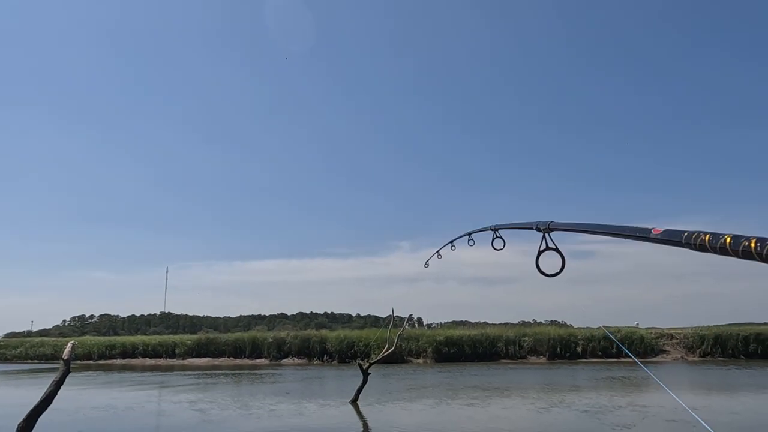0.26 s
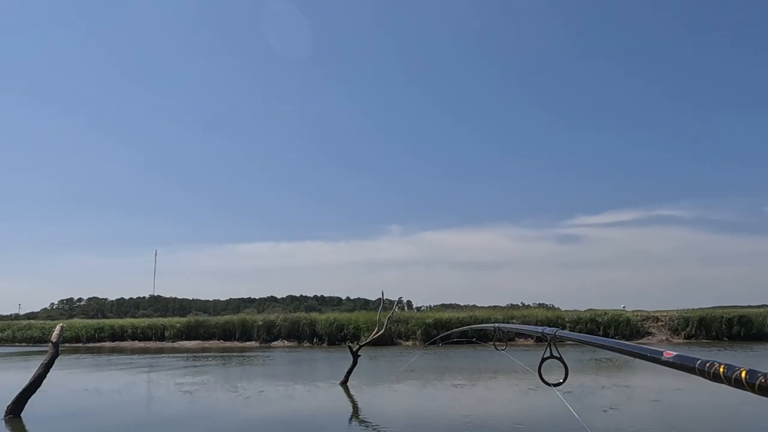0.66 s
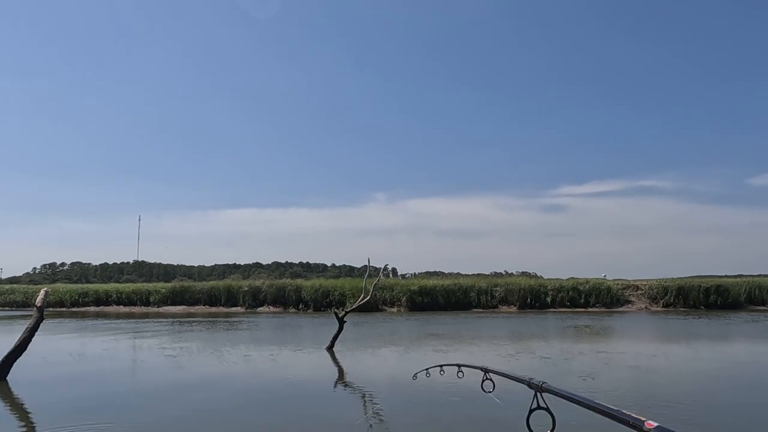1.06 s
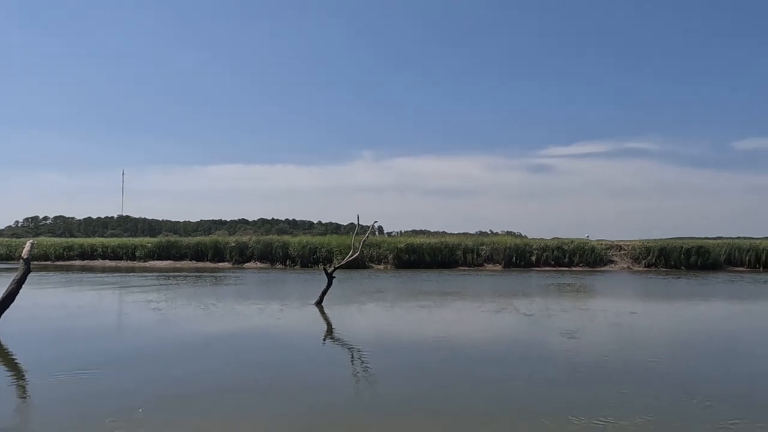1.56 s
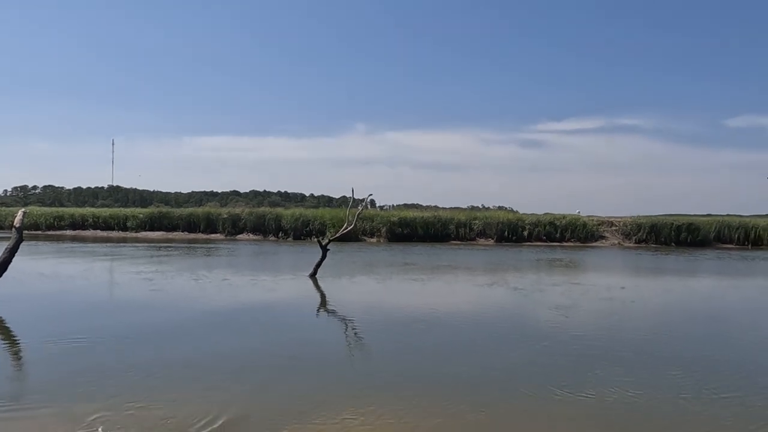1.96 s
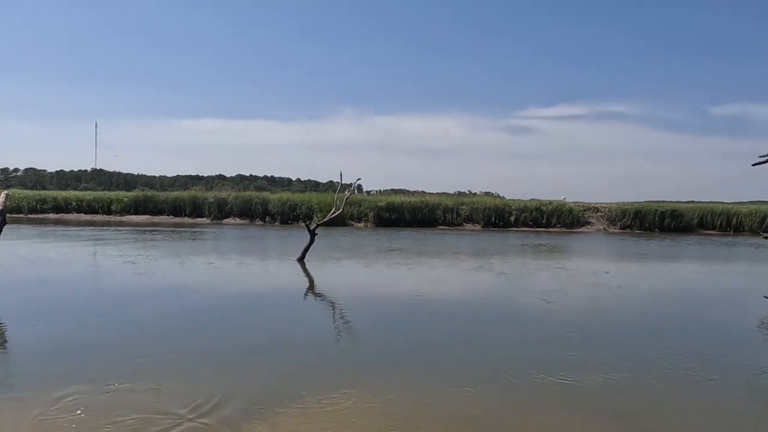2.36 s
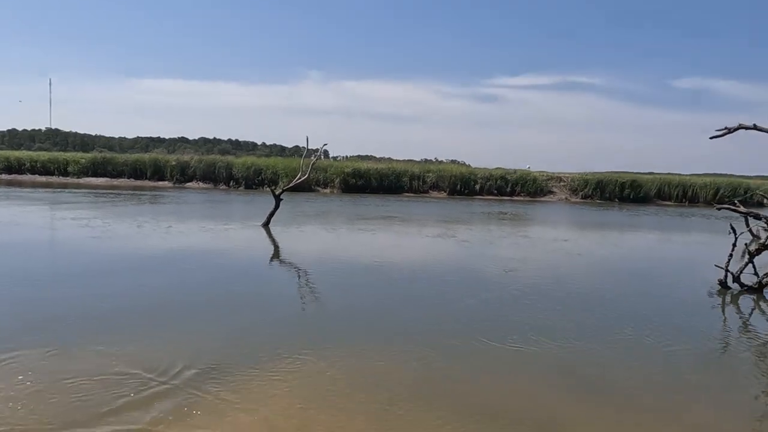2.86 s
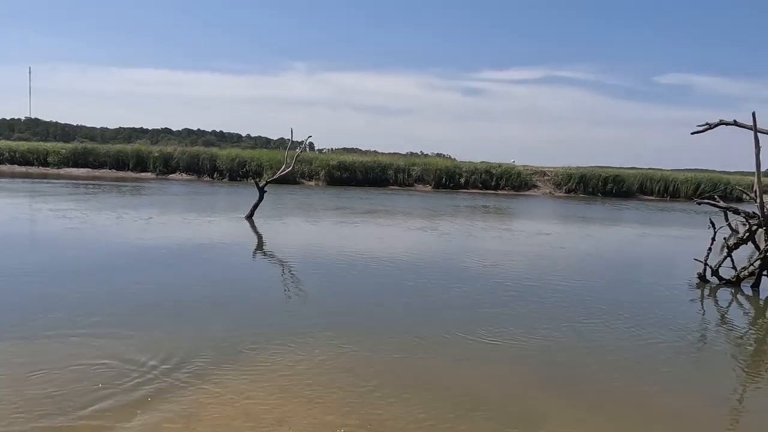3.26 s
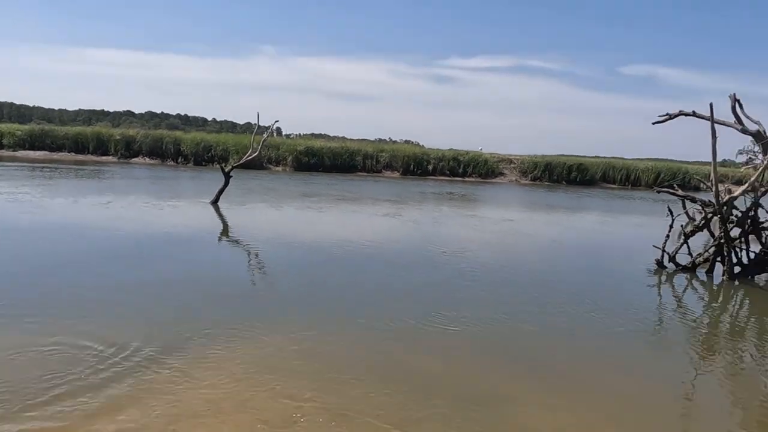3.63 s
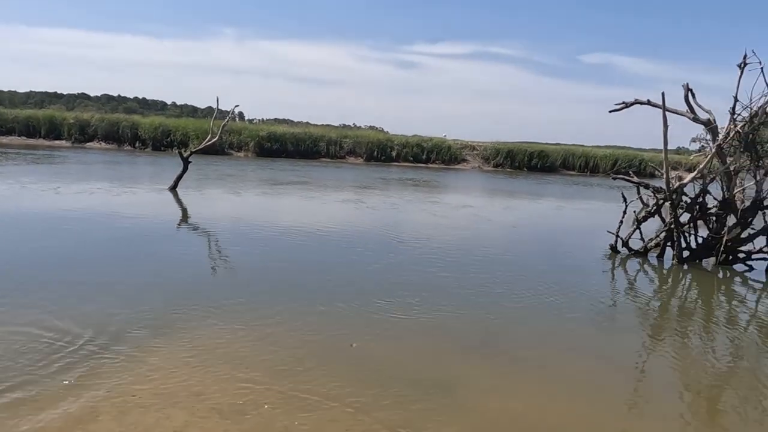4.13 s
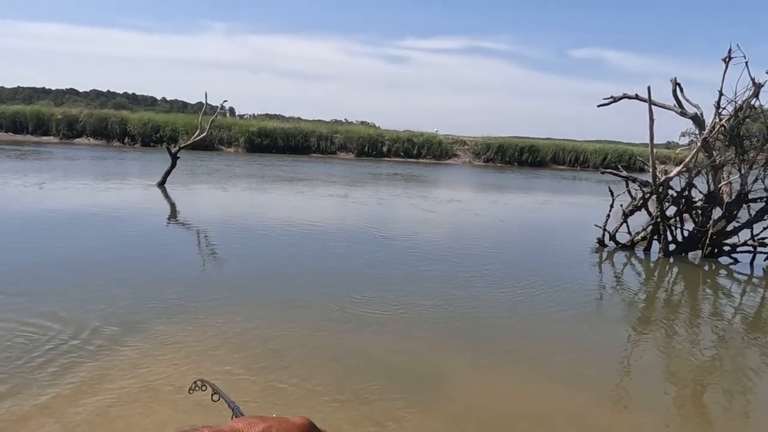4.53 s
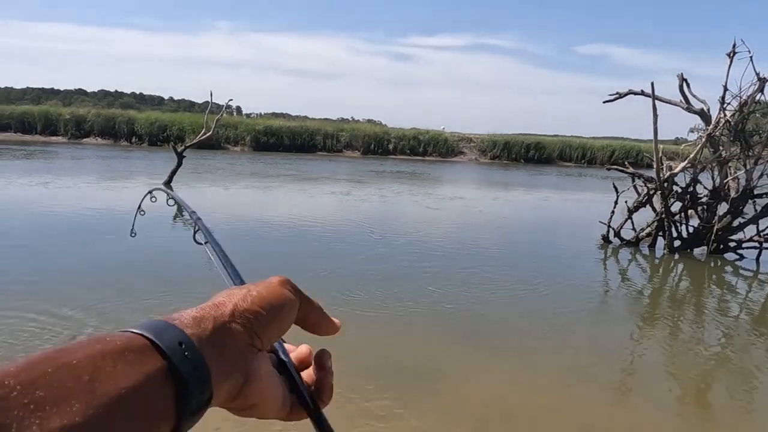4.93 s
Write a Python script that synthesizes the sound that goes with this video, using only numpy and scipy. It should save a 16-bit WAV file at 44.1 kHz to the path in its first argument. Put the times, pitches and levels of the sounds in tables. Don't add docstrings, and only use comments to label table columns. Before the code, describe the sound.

Open air at a creek bank, no echo, with a small stereo microphone close to the reel. Low wind rumble, buffeting and a hollow hum run throughout, over a very faint marsh rustle; a heavy low gust peaks near 2.3 s. From 0 to about 3.2 s a spinning reel is cranked in short uneven pushes: a wavering mid-high gear whine, dry rubbing and thin hiss, strongest around 0.8-1.0 s and again at 2.85 s. Dull knocks fall near 0.8, 1.6, 2.05 and 2.35 s among tiny clicks and ticks. A bright drip lands at 3.2 s. From 3.35 to 3.9 s wind makes a low, unsteady moan with light drips and faint brushing. At 4.2 s the water breaks: the loudest sharp slap comes at 4.37 s, followed by short gulps, gurgling bubbles and spray, cracks at 4.6 s, a deep rising gulp at 4.85 s, and patters to the end.

```python
import sys
import numpy as np
from scipy import signal
from scipy.io import wavfile

SR = 44100
rng = np.random.default_rng(int(sys.argv[2]) if len(sys.argv) > 2 else 0)


def master_out(mix):
    frames = np.transpose(np.atleast_2d(mix))
    ceiling = np.clip(frames, -1, 1)
    pcm = np.round(ceiling * 32767).astype(np.int16)
    wavfile.write(sys.argv[1], SR, pcm)


def invert_db(x):
    u = np.asarray(x, float) / 20
    return 10 ** u


N = 228967

# frequency in Hz, density in dB per Hz.
HISS_SPECTRUM = [(1000, -9), (1700, -2), (2440, -11), (2920, -9.5), (4150, -12.5), (5650, -10.5),
                 (10200, -20.5), (11700, -17.5), (13200, -40)]


def rms_one(x):
    return x / np.sqrt(np.mean(x ** 2) + 1e-20)


def in_time(rows):
    s, *columns = np.transpose(rows)
    return [np.interp(np.arange(N) / SR, s, c, left=-120, right=-120) for c in columns]


def at_hz(points, hz):
    table_hz, values = np.transpose(points)
    return np.interp(np.log(hz), np.log(table_hz), values)


def drift(rate):
    r = np.exp(-80 * np.pi * rate / SR)
    slow = signal.lfilter([1], [1, -2 * r, r * r], rng.standard_normal(N // 40 + 2002))[2000:]
    return np.interp(np.arange(N) / 40, np.arange(len(slow)), rms_one(slow))


def swells(rows, column, rise_db_s, fall_db_s):
    t = np.arange(0, N + 32, 32) / SR
    power = 0
    for row in rows:
        early = np.maximum(row[0] - t, 0)
        late = np.maximum(t - row[0] - row[1], 0)
        power = power + invert_db(2 * (row[column] - rise_db_s * early - fall_db_s * late))
    return np.interp(np.arange(N) / SR, t, 10 * np.log10(power + 1e-12))


def pair(likeness):
    mid, side = rng.standard_normal((2, N))
    alike = np.clip(likeness, 0, 1)
    return np.sqrt(.5 + alike / 2) * mid + np.sqrt(.5 - alike / 2) * side * [[1], [-1]]


def band(x, low_hz, high_hz, order=2):
    return signal.sosfilt(signal.butter(order, [low_hz, high_hz], "band", fs=SR, output="sos"), x)


def resonance(x, hz, width_hz):
    r = np.exp(-np.pi * width_hz / SR)
    poles = [1, -2 * r * np.cos(2 * np.pi * hz / SR), r * r]
    return signal.lfilter([(1 - r * r) / 2, 0, (r * r - 1) / 2], poles, x)


def grainy_noise(spectrum, per_s, size_db, grain_db, patchy_db, shared, size=2):
    # frequency in Hz, left-right likeness from 0 to 1.
    likeness_curve = [(20, .9), (60, .75), (130, .97), (400, 0.34), (1500, 0.73), (5000, 0.78),
                      (9000, 0.56), (15000, 0.12)]
    grains = invert_db(size_db * np.minimum(rng.exponential(1, N), 4)) * (rng.random(N) < per_s / SR)
    grains = invert_db(grain_db) * rms_one(signal.lfilter([1], [1, -1.92, .9216], grains))
    white = rng.standard_normal((2, 2, N))
    together = drift(3.6)
    low, top = spectrum[0][0], spectrum[-1][0]
    edges = np.geomspace(low, top, int(2 * np.log2(top / low)) + 2)
    out = 0
    for k, (a, b) in enumerate(zip(edges, edges[1:])):
        shake = 1 + np.roll(grains, k // size * N // 7)
        mid, side = band(shake * white[k % 2], a, b, order=3)
        hz = np.sqrt(a * b)
        alike = np.clip(at_hz(likeness_curve, hz), 0, 1)
        gain = invert_db(at_hz(spectrum, hz) + patchy_db * (shared * together + drift(21)))
        out = out + gain * (np.sqrt(1 + alike) * mid + np.sqrt(1 - alike) * side * [[1], [-1]])
    return rms_one(out)


def hits(table, pan_db, cycles=0.78, crack_ms=0.69, tail_db=-19.0):
    out = np.zeros((2, N + 2000))
    t = np.arange(2000) / SR
    swell = t * 1000 / crack_ms
    tail = invert_db(tail_db) * np.exp(-t / 0.0089) * (1 - np.exp(-swell ** 2))
    fade = swell ** 3 * np.exp(-swell * 3) * 11.3 + tail
    for s, db, hz, bright_db in table:
        noise = rng.standard_normal((3, 2000))
        ring = np.sin(2 * np.pi * hz * t) * (t * hz / cycles) * np.exp(1 - t * hz / cycles)
        crack = invert_db(4.5) * band(noise[0] * fade, hz * 0.54, min(hz * 1.43, 15000))
        bright_hz = min(4200 + 2000 * abs(noise[1, 0]), 7000)
        wide_noise = noise[1] + .5 * noise[2] * [[1], [-1]]
        bright = invert_db(bright_db - 1) * band(wide_noise * fade, bright_hz, 12000, order=3)
        hit = (ring + crack + bright) * invert_db([[pan_db / 2], [-pan_db / 2]])
        out[:, round(s * SR):][:, :2000] += invert_db(db) * hit
    return out[:, :N]


def marsh():
    rustle = grainy_noise(HISS_SPECTRUM, per_s=30., size_db=3.0, grain_db=-14, patchy_db=-4.5, shared=.3)
    onset = np.clip(np.arange(N) / SR / .07, 0, 1) ** 4
    return band(invert_db(-69) * rustle * onset, 870, 11800, order=4)


def wind():
    # time in seconds, level in dB.
    gust_curve = [(0.0, -44), (0.64, -31), (0.92, -36), (1.19, -44.5), (1.56, -23.5), (1.72, -38.5),
                  (2.14, -35.5), (2.3, -16.5), (2.41, -32.5), (3.04, -44.5), (3.22, -29.5), (3.47, -35.5),
                  (4.21, -38.5), (4.29, -30), (4.8, -32), (4.87, -43.5), (5.07, -26.5), (5.19, -29.5)]
    # start in seconds, hold in seconds, level in dB.
    eddy_rows = [
        (.02, 0.17, -42.5),
        (.9, 0.042, -39.5),
        (1.5, 0.26, -39),
        (4.29, 0.07, -42.5),
    ]
    # start in seconds, hold in seconds, level in dB.
    crosswind_rows = [
        (3.45, 0.23, -42),
        (3.85, 0.35, -48),
        (4.87, 0.21, -42),
    ]
    rise_db_s, fall_db_s = 54, 45
    slow_db, = in_time(gust_curve)
    calm = invert_db(-46 + 0.06 * (slow_db - slow_db.mean()))
    buffet_gain = np.hypot(calm, invert_db(swells(eddy_rows, 2, rise_db_s, fall_db_s)))
    cavity_gain = np.hypot(invert_db(-51.5), invert_db(swells(crosswind_rows, 2, rise_db_s, fall_db_s)))
    slow = rms_one(band(pair(0.93), 3.88, 19.3, order=4)) * invert_db([[-2.6], [2.4]])
    buffet = rms_one(band(resonance(pair(0.85), 24.0, 30.5), 14.8, 154))
    buffet = buffet * invert_db(3.0 * drift(1.9)) * invert_db([[-.8], [.8]])
    cavity = rms_one(band(resonance(pair(0.97), 166.0, 41.6), 91, 299, order=4)) * invert_db(0.71 * drift(13.5))
    skirt = rms_one(band(pair(0.9), 200, 397, order=3)) * invert_db(-65 + 2.2 * drift(2.8))
    return invert_db(slow_db) * slow + buffet_gain * buffet + cavity_gain * cavity + skirt


def moan():
    # time in seconds, pitch in Hz, level in dB.
    moan_curve = [(3.3, 152.5, -62), (3.37, 158, -33.5), (3.42, 148, -65), (3.5, 189.7, -33.5),
                  (3.58, 186.6, -39), (3.72, 172.9, -46), (3.8, 121.5, -45), (3.86, 164.7, -37.5),
                  (3.92, 180.3, -61)]
    hz, db = in_time(moan_curve)
    phase = 2 * np.pi * np.cumsum(np.maximum(hz, 0) * (1 + 0.088 * drift(29.7))) / SR
    return (np.sin(phase) + invert_db(-35.0) * np.sin(2 * phase)) * invert_db(db + 2.5 * drift(41))


def drips():
    # time in seconds, peak in dB, pitch in Hz, bright part in dB.
    drip_rows = [(.704, -42, 3330, -13), (2.4915, -43.5, 6400, -21), (3.2118, -33, 4600, -7),
                 (3.2887, -58, 1970, 22), (3.3026, -43.5, 3140, 6.5), (3.4984, -54.5, 3170, 5),
                 (3.5533, -56, 1944, 5), (3.5715, -41.5, 5000, -31), (3.8877, -44, 4640, -3),
                 (3.934, -42, 3406, 3.5), (3.9592, -40.5, 5410, 2.5), (3.9967, -42.5, 6960, -30),
                 (4.1178, -36, 5340, -13)]
    return hits(drip_rows, pan_db=4.5)


def slaps():
    # time in seconds, peak in dB, pitch in Hz, bright part in dB.
    slap_rows = [(4.213, -54, 2220, -15), (4.2387, -29, 2970, -32), (4.2772, -35, 1610, -19.5),
                 (4.347, -45, 1420, -36), (4.3695, -14.5, 2800, -22), (4.442, -59, 1650, -5),
                 (4.4553, -32.5, 2630, -8), (4.4735, -31, 1800, -12), (4.5, -36, 2100, -8),
                 (4.5398, -37, 2800, 1), (4.5992, -21, 4700, -12), (4.6016, -22, 4680, -14),
                 (4.6897, -35, 2700, -10), (4.9431, -38, 4900, -20), (4.3785, -31, 2600, -20),
                 (4.386, -34, 3200, -13), (4.298, -42, 7500, -7), (4.862, -38, 5800, -20),
                 (4.899, -32, 7000, -20), (5.1546, -39, 1940, 0), (4.7634, -40, 1260, -32),
                 (4.796, -33, 5400, -25), (4.839, -33, 1980, -15), (4.8788, -20, 1370, -8.5),
                 (4.92, -37, 6500, -10), (4.9875, -40, 1480, 5), (5.008, -37, 5500, 6),
                 (5.0218, -38, 1730, 15), (5.0282, -29, 1220, 0), (5.0455, -33.5, 1980, 8),
                 (5.142, -40.5, 1980, 10.5)]
    return hits(slap_rows, pan_db=3.5, cycles=1.7, crack_ms=0.85, tail_db=-15.0)


def bubble(start_hz, end_hz, length, late=1.3):
    u = np.arange(int(length * SR)) / (length * SR)
    hz = start_hz * (end_hz / start_hz) ** (u ** late)
    return np.sin(2 * np.pi * np.cumsum(hz) / SR) * np.sin(np.pi * u ** .5) ** 0.41


def short_tones():
    # time in seconds, start pitch in Hz, length in seconds, peak in dB.
    gulp_rows = [
        (3.224, 601, 0.05, -48.5),
        (3.358, 623, 0.04, -57),
        (3.4, 469, 0.079, -56),
        (4.561, 440, 0.021, -28),
        (4.718, 646, 0.0366, -42.5),
        (4.841, 285, 0.118, -29),
        (5.101, 598, 0.047, -50.5),
    ]
    # time in
    # seconds, pitch in Hz, length in seconds, peak in dB.
    pop_rows = [(.189, 235, 0.0163, -36), (1.15, 615, 0.041, -47), (2.6, 533, 0.015, -54),
                (.7, 1060, 0.04, -54), (3.305, 1004, 0.039, -49), (3.3, 316, 0.041, -42),
                (3.835, 1800, .014, -56), (3.892, 885, 0.034, -48.5), (3.99, 990, 0.04, -59),
                (4.17, 1690, 0.0047, -36), (4.28, 542, 0.011, -38.5), (4.402, 1264, .0087, -37),
                (4.779, 860, 0.0094, -36), (5.062, 2020, 0.0073, -39), (4.729, 1200, .02, -44),
                (5.128, 950, 0.018, -46), (5.158, 950, .02, -50), (.51, 2600, 0.071, -68),
                (3.53, 560, .06, -56), (4.345, 450, .008, -40), (4.3, 800, .015, -42),
                (4.52, 890, .02, -45), (4.702, 340, 0.012, -33.5), (4.589, 730, 0.018, -28),
                (4.635, 893, 0.042, -38), (4.652, 370, .018, -30.5), (4.632, 400, .018, -39),
                (5.177, 890, 0.077, -38.5)]
    # time in seconds, pitch in Hz, length in seconds, peak in dB.
    squeak_rows = [(.479, 1180, 0.03, -55), (.51, 1100, .025, -55), (.575, 2780, 0.075, -61),
                   (4.212, 1000, .014, -37), (4.264, 1050, .018, -39), (2.36, 1250, 0.028, -56.5),
                   (2.04, 1727, 0.084, -51.5), (2.31, 1600, 0.04, -45), (.685, 800, 0.03, -53),
                   (3.155, 1150, 0.05, -54), (3.21, 1750, .03, -56), (4.771, 1146, 0.008, -35)]
    events = [(*row, np.exp(7.0 * row[2] ** .7)) for row in gulp_rows]
    events += [(*row, 1.088) for row in pop_rows]
    events += [(*row, .83) for row in squeak_rows]
    out = np.zeros(N + SR)
    for s, start_hz, length, db, bend in events:
        deep = start_hz < 300
        wave = bubble(start_hz, start_hz * bend, length, 1.8 if deep else 1.3)
        if deep:
            wave = wave * (bend * 300 / start_hz) ** np.linspace(0, -.9, len(wave))
        out[round(s * SR):][:len(wave)] += invert_db(db) * wave
    return out[:N] * invert_db(3.5 * drift(220))


def crowd(count, low_hz, span, cycles, spread_db):
    start = int(4.1 * SR)
    out = np.zeros(N + SR)
    for when, pitch, rise, size in rng.random((count, 4)):
        hz = low_hz * span ** pitch
        wave = bubble(hz, hz * (0.91 + 0.38 * rise), cycles / hz)
        out[start + int(when * (N - start)):][:len(wave)] += invert_db(-spread_db * size - 5 * pitch) * wave
    return np.pad(rms_one(out[start:N]), (start, 0))


def water():
    # start in seconds, hold in seconds, spray in dB, gurgle in dB.
    thrash_rows = [(4.215, 0.077, -44.5, -50), (4.29, 0.047, -51.5, -43), (4.365, 0.03, -42, -45),
                   (4.44, 0.081, -48.5, -78), (4.535, .05, -43, -55), (4.585, .09, -42, -44),
                   (4.69, .11, -42.5, -43), (4.845, 0.03, -45, -48), (4.875, 0.028, -39.5, -44),
                   (4.915, .045, -45, -48), (5.012, 0.045, -40, -49.5), (5.08, 0.14, -50, -70)]
    # frequency in Hz, density in dB per Hz.
    spray_spectrum = [(530, -31), (900, 2), (1040, 1), (1400, -0.5), (2310, -8), (2760, -2.5), (3680, -6.5),
                      (4780, -8), (7010, -9), (8700, -15.5), (15600, -30.5)]
    spray_db = swells(thrash_rows, 2, rise_db_s=550, fall_db_s=390)
    gurgle_db = swells(thrash_rows, 3, rise_db_s=459, fall_db_s=504)
    gurgle = invert_db(gurgle_db) * crowd(count=500, low_hz=450, span=4.5, cycles=5.0, spread_db=14)
    droplets = invert_db(-4.5) * crowd(count=1000, low_hz=1500, span=5.0, cycles=9.0, spread_db=24)
    mist = grainy_noise(spray_spectrum, per_s=380.0, size_db=1.5, grain_db=-3, patchy_db=3.5, shared=0.4)
    spray = invert_db(spray_db) * (droplets + invert_db(0.4) * mist)
    return (short_tones() + gurgle + spray) * invert_db([[1.1], [-1.1]])


def reel_ticks():
    # time in seconds, peak in dB, pitch in Hz.
    knock_rows = [
        (.7836, -29.5, 1980),
        (1.5996, -25.5, 2290),
        (2.0563, -31, 1920),
        (2.3565, -30, 1930),
    ]
    # time in seconds, peak in dB, pitch in Hz, bright part in dB.
    bail_rows = [(.0728, -42, 2080, -19), (.2733, -48, 2350, -4), (.2897, -37.5, 2600, -34),
                 (.4204, -38, 1990, -34), (.656, -38.5, 1900, -16), (1.2262, -38.5, 2730, -29),
                 (1.5506, -35, 2840, -32), (2.011, -42.5, 1890, 3.5), (2.1884, -36, 3000, -22),
                 (2.4947, -46, 2300, -20), (2.507, -43, 1800, -20), (2.53, -44, 1800, -20),
                 (2.5536, -38, 1850, -11), (2.8838, -41, 5570, -23), (2.9095, -34, 2950, -7),
                 (3.606, -47, 2245, -25), (3.6574, -48.5, 1900, -1.5)]
    # time in seconds, peak in dB, pitch in Hz, bright part in dB.
    tick_rows = [(.1165, -52, 2040, 3), (.148, -47.5, 6600, -15), (.9497, -45, 2620, -5),
                 (1.0854, -47, 2140, 4), (1.2131, -45, 1900, -13), (.255, -53, 6000, -3),
                 (.72, -50, 5500, -8), (.797, -47, 4500, 0), (.86, -53, 6000, 0), (1.152, -52, 5500, -12),
                 (1.315, -50, 4500, 0), (1.39, -52, 6000, 0), (.545, -53, 4000, -10),
                 (.893, -47, 1800, -15), (2, -46, 2110, -1), (2.177, -38.5, 1700, -7),
                 (2.319, -47, 2400, -5), (2.345, -50, 1900, -20), (2.454, -64, 2260, 14),
                 (2.5282, -62, 1900, -10), (2.564, -41, 2400, -21), (2.5737, -39, 4540, -15),
                 (2.5835, -45, 5000, -21), (2.5994, -43, 5070, -14), (2.61, -46, 1990, -17),
                 (2.87, -59, 2750, -13), (3.0175, -54, 2980, -26), (3.1772, -45, 1930, -14),
                 (3.414, -49.5, 2950, 7.5), (3.808, -58, 2630, 3), (4.191, -42, 2630, -13),
                 (3.754, -49, 5000, -15), (3.8475, -50.5, 5450, -10), (3.9004, -44, 3970, -5),
                 (3.9248, -45, 5400, -20), (3.969, -49, 5000, -20), (3.979, -43, 1500, -20),
                 (4.0455, -54, 5160, -2), (4.125, -42, 4500, -3)]
    dull_knocks = [(*row, -33) for row in knock_rows]
    return hits(dull_knocks, pan_db=3) + hits(bail_rows, pan_db=-6) + hits(tick_rows, pan_db=2)


def mesh_tone(jitter):
    # start in seconds, length in seconds, slack pitch in Hz, top pitch in Hz, level in dB.
    push_rows = [(0.14, 0.13, 1500, 1870, -54), (0.28, 0.11, 1830, 1970, -49),
                 (.385, .075, 1700, 1900, -51), (.39, .07, 1450, 1550, -45), (.25, 0.24, 870, 958, -58),
                 (.77, 0.22, 1400, 1652, -41), (.885, 0.1104, 1500, 1640, -40),
                 (.26, 0.22, 1480, 1400, -46), (0.48, .24, 1450, 1520, -50), (.3, .14, 2800, 2900, -63),
                 (2.4, 0.21, 1480, 1524, -50.5), (2.58, 0.296, 1500, 1450, -50.5),
                 (2.0, .14, 1560, 1500, -51), (1.97, 0.0895, 1900, 2080, -56.5),
                 (1.08, .09, 1400, 1600, -55), (1.2, 0.13, 1720, 2180, -49), (1.15, .075, 1820, 1780, -52),
                 (1.32, .08, 1700, 1620, -54), (1.43, 0.108, 1320, 1554, -50.5),
                 (1.58, .19, 1380, 1560, -48), (1.79, .12, 1700, 1950, -57), (1.89, 0.117, 1780, 2000, -54),
                 (2.14, 0.1, 1550, 1800, -51.5), (2.21, .14, 1480, 1767, -49.5),
                 (2.844, 0.42, 1465, 1626, -40.5)]
    out = np.zeros(N)
    for s, length, slack_hz, top_hz, db in push_rows:
        i = round(s * SR)
        u = np.arange(int(length * SR)) / (length * SR)
        arch = np.sin(np.pi * u ** (np.log(.5) / np.log(.58)))
        hz = slack_hz + (top_hz - slack_hz) * arch
        level = invert_db(db - 54 * length * u) * np.minimum(6 * np.sin(np.pi * u), 1)
        out[i:i + len(u)] += level * np.sin(2 * np.pi * np.cumsum(hz * jitter[i:i + len(u)]) / SR)
    return out


def gears():
    # frequency in Hz, width in Hz, level in dB.
    body_modes = [(1500, 265, 4), (957, 32, -5), (1900, 140, -5.5), (2800, 660, -12)]
    # time in seconds, level in dB.
    effort_curve = [(0, -37), (.02, -104), (.08, -59.5), (.33, -47.5), (.55, -53.5), (.7, -50), (.86, -49),
                    (.98, -47), (1.12, -56), (1.37, -50), (1.49, -51.5), (1.61, -49), (1.89, -57.5),
                    (2.05, -51), (2.5, -57), (3.03, -55), (3.24, -60), (3.42, -97)]
    # start in seconds, hold in seconds, rub in dB, hiss in dB.
    brush_rows = [(0, 0.0029, -50, -79), (.09, 0.49, -54, -76), (.28, .13, -66, -65), (.95, .09, -68, -65),
                  (.6, 0.49, -55, -74.5), (1.1, 0.2, -52, -67), (1.4, 0.016, -49, -69),
                  (1.57, 0.18, -52, -63), (2.59, 0.049, -53, -71), (2.66, 0.17, -55.5, -78),
                  (3.21, 0.07, -51, -62), (3.5, .08, -58, -80), (3.8, 0.28, -62, -64.5),
                  (4.19, 0.06, -58, -66)]
    # frequency in Hz, density in dB per Hz.
    rub_spectrum = [(150, -26), (260, -30), (350, -10), (480, 4.5), (856, 9), (993, 2), (1300, 10.5),
                    (1690, -46), (2860, -120)]
    body_db, = in_time(effort_curve)
    rub_gain = np.hypot(invert_db(-72), invert_db(swells(brush_rows, 2, rise_db_s=350, fall_db_s=288)))
    brush_hiss = invert_db(swells(brush_rows, 3, rise_db_s=123, fall_db_s=123))
    hiss_gain = np.hypot(invert_db(-70 + (body_db + 50)), brush_hiss)
    whine = mesh_tone(1 + .024 * drift(85)) * invert_db(3.8 * drift(55))
    lagged = np.array([np.roll(whine, 3), whine])
    friction = pair(0.59)
    body = 0
    for hz, width_hz, db in body_modes:
        body = body + invert_db(db) * resonance(resonance(friction, hz, width_hz), hz, width_hz)
    body = invert_db(body_db - 3.5 + 2.5 * drift(53)) * rms_one(body)
    hiss = grainy_noise(HISS_SPECTRUM, per_s=90., size_db=3.5, grain_db=-4, patchy_db=1.4, shared=.5, size=4)
    hiss = band(hiss, 900, 12500, order=12)
    rub = grainy_noise(rub_spectrum, per_s=72.0, size_db=4.5, grain_db=-6, patchy_db=3.5, shared=0.57)
    ring = (lagged + body) * invert_db([[-.8], [.8]])
    return ring + invert_db(5.0) * hiss_gain * hiss + invert_db(-4.5) * rub_gain * rub


def scene():
    background = marsh() + wind() + moan()
    fish = drips() + slaps() + water()
    reel = reel_ticks() + gears()
    return background + fish + reel


def low_pass(x):
    return signal.sosfilt(signal.butter(12, 15730, fs=SR, output="sos"), x)


def record(dry):
    coloured = dry - 0.69 * resonance(dry, 9820, 3560)
    coloured = signal.sosfilt(signal.cheby2(12, 50, 15800, fs=SR, output="sos"), coloured)
    return low_pass(coloured)


dry = scene()
out = record(dry)
master_out(out)
```